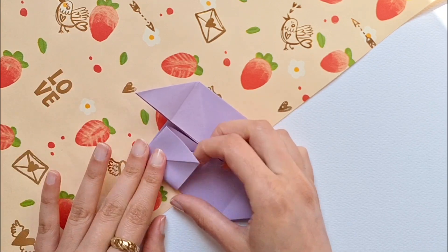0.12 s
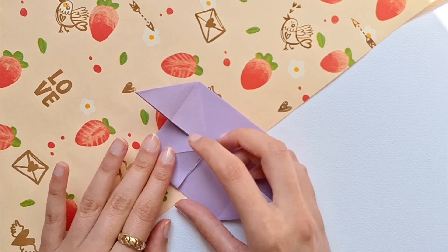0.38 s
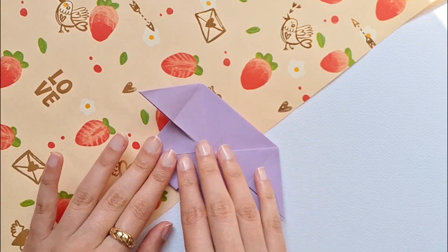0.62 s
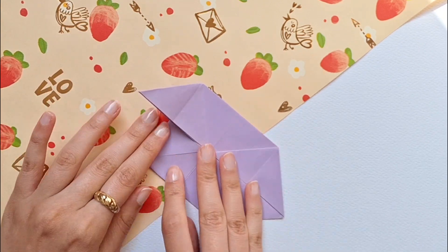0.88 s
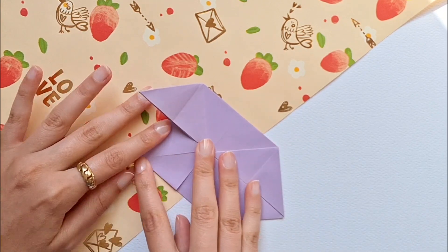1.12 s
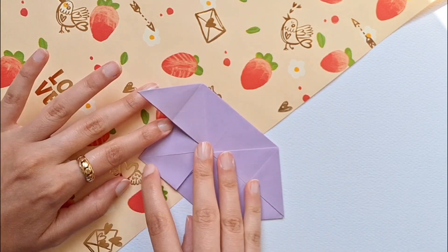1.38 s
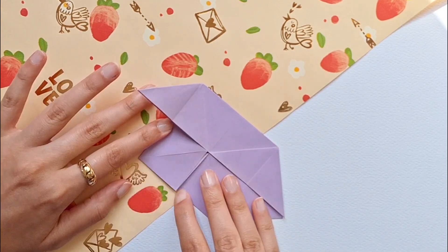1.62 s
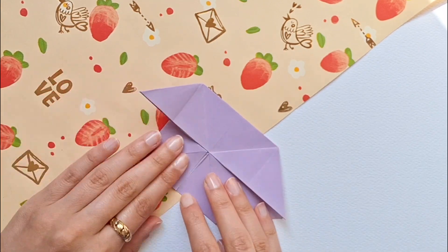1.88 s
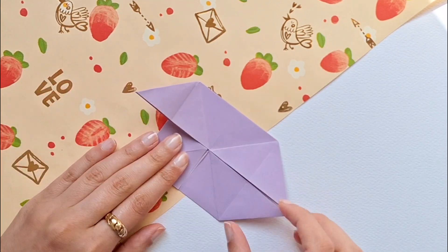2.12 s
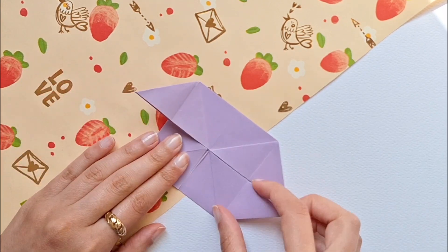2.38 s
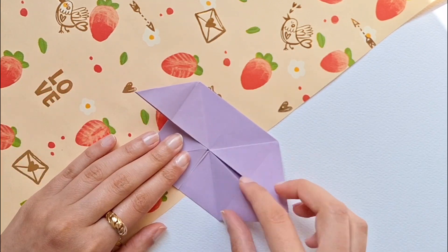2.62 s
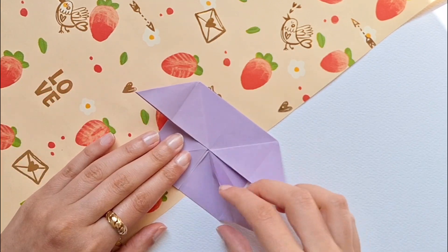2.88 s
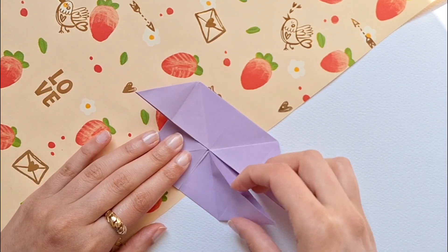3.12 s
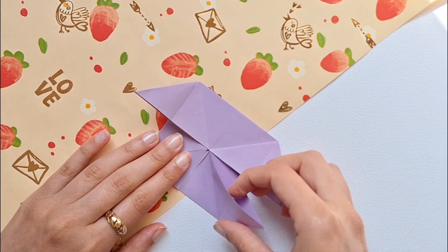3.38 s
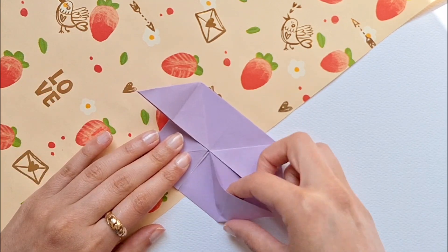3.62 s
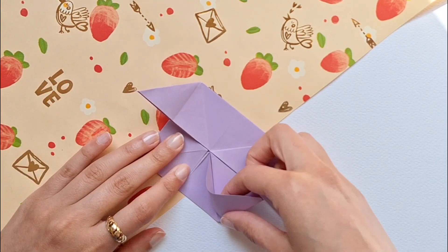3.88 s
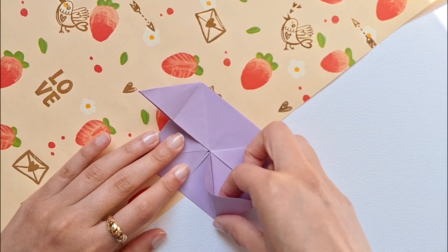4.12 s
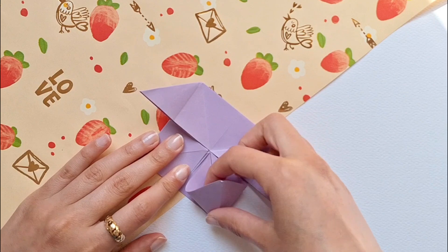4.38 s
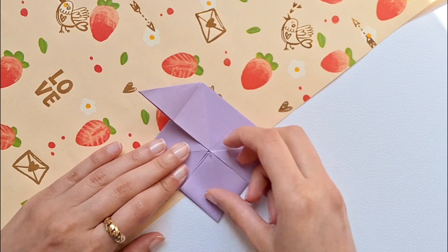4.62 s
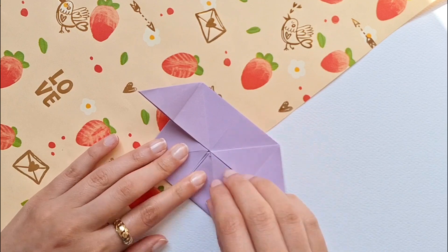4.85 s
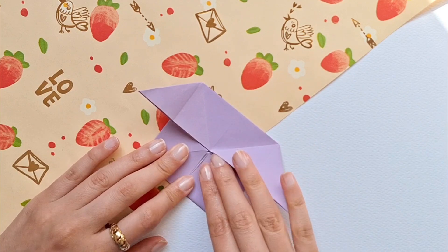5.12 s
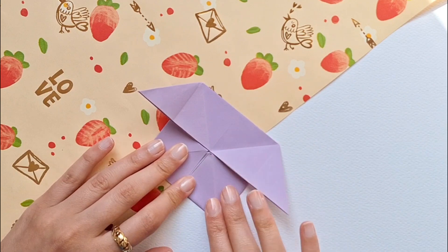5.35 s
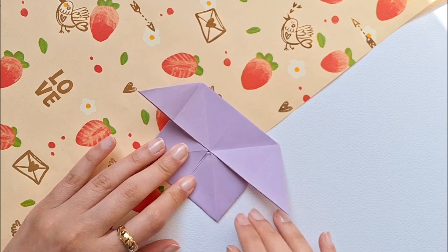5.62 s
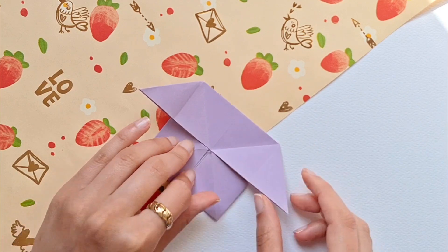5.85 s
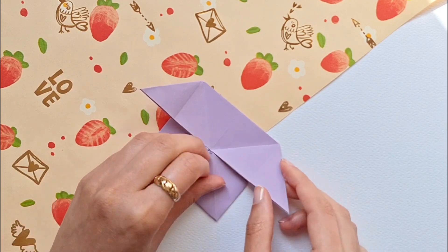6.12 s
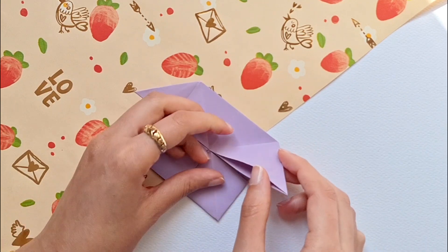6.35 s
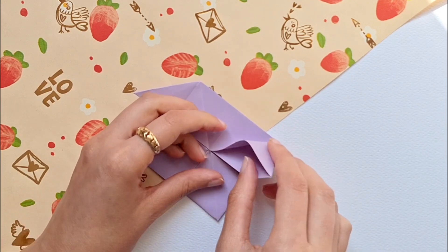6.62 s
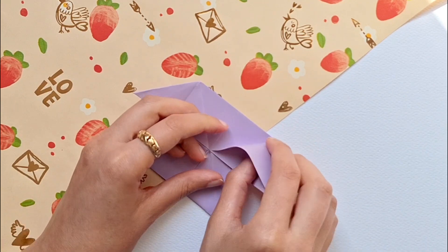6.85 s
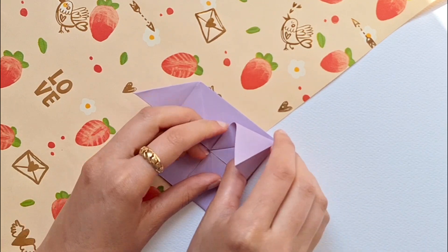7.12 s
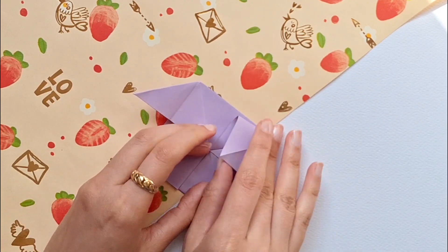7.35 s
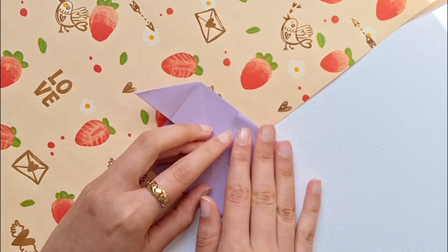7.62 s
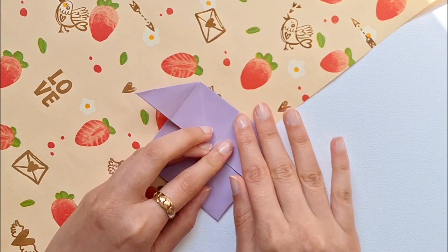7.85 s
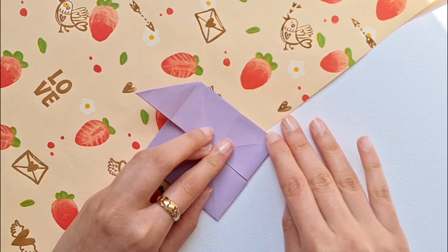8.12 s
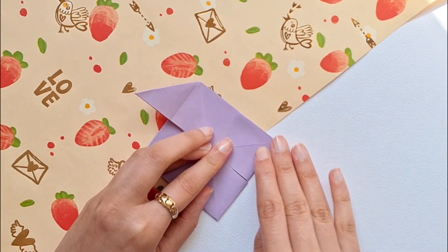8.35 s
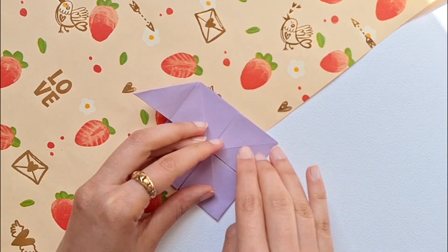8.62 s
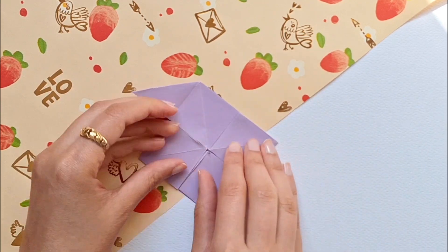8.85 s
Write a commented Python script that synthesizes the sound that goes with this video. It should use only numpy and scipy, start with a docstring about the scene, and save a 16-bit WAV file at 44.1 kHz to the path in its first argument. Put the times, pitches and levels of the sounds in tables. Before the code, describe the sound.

A close stereo microphone hears hands folding thin paper on a table in a quiet room, with faint hiss and a barely audible, very high electronic whine. At 0.1 s a crisp snap and short flex break soft sliding; smaller ticks follow. From 1.0 s fingertips tap dully, gathering into woody thumps at 1.4-1.8 s, with the sharpest crease crack near 1.67 s and more until 2.0 s. Gentle sparse strokes occupy 2-4.5 s, then clicks and flexing near 4.65 s. Outside, low rumble gains booming bass from 4.1 s as an engine hum climbs until about 5.4 s. Taps at 5.8 s lead into dense crackling at 6.2-7.2 s, then a longer smoothing rustle and tiny skin squeak near 7.7 s. Bass swells around 7.4 s and most strongly at 8.3-8.7 s; engine tones fall as final snaps and table knocks sound near 8.9 s, rumble still strong.

```python
"""A soft slide of fingers over a low rumble, then a snap: hands fold and press a paper figure on a table.
Sliding and flexing paper is shaped noise, creases snap in short bursts, and touches ring the table top.
Outside a vehicle draws near: low noise swells, engine tones glide and short bass notes boom in the room.
A faint electronic whine and a steady hiss lie behind it all; the two ports hear sounds shifted in time."""
import sys
import numpy as np
from scipy import signal
from scipy.fft import rfft, irfft, next_fast_len
from scipy.io import wavfile
from scipy.ndimage import uniform_filter1d

SR = 44100
rng = np.random.default_rng(int(sys.argv[2]) if len(sys.argv) > 2 else 0)


def unload_audio(sound):
    """Save the sound as a 16-bit wav file, at the path given as the first command line argument."""
    columns = np.transpose(np.atleast_2d(sound))
    # keep every value between -1 and 1, then stretch to whole-number steps
    steps = np.round(np.clip(columns, -1, 1) * 32767)
    wavfile.write(sys.argv[1], SR, steps.astype(np.int16))


N = 396018  # length [samples]

# Levels in the tables come before the left-right balance. "Place" is where in its length an event peaks.
# Colour of the steady hiss: (frequency [Hz], relative level [dB])
HISS_COLOUR = [(88, -36), (150, -4), (193, -0.5), (254, -2), (375, -11), (771, -21.5), (1930, -23),
               (3880, -28), (7530, -46), (8640, -40), (10500, -30), (14100, -29.5), (15800, -20)]
HISS_DB = -76.5
# The whine, one list for each pitch: (time [s], level [dB])
WHINE_LEVELS = [
    [(0.0, -103), (0.406, -103), (0.752, -92), (1.744, -89), (1.8, -95)],
    [(2.1, -100), (2.25, -80), (3.17, -84.5), (4.18, -78.5), (4.69, -81), (4.78, -78.5), (5.73, -80),
     (6.2, -81)],
    [(6.22, -83), (7.3, -78), (7.59, -86), (8.0, -73.5), (8.57, -85), (8.98, -83)],
]
# Pitches of the whine, which steps down twice: (frequency [Hz])
WHINE_PITCHES = (14482, 14461, 14413)
# Deep hump of far traffic: (time [s], level [dB])
TRAFFIC_LEVEL = [(0.0, -62), (1.67, -59), (1.7, -54.5), (1.98, -69), (2.1, -55.5), (2.73, -67), (2.77, -56),
                 (2.85, -70.5), (3.1, -55.5), (3.93, -63.5), (5.2, -57.5), (5.5, -74), (5.85, -53),
                 (6.22, -67), (6.3, -56.5), (8.0, -60.5), (8.1, -52.5), (8.23, -70), (8.5, -48.5),
                 (8.98, -59)]
# Upper rumble of the nearing vehicle: (time [s], level [dB])
VEHICLE_LEVEL = [(0.0, -63.5), (0.1, -63.5), (1.35, -73), (1.4, -57.5), (1.93, -69.5), (2.82, -73),
                 (2.9, -72), (3.1, -65), (5.63, -64), (5.9, -55.5), (5.95, -59), (6.03, -57.5), (6.1, -61),
                 (6.93, -67), (7.1, -56), (7.18, -55.5), (7.23, -58), (7.63, -56.5), (7.83, -57),
                 (8.7, -52.5), (8.73, -50.5), (8.98, -48)]
# The vehicle's lower hump: its level where the upper rumble is at -63.5 dB, and dB per dB that it follows
BODY_DB, BODY_FOLLOW = -62, 0.76
# Swells of the room boom: (start [s], length [s], frequency [Hz], top level [dB], place [0-1])
BOOM_SWELLS = [(4.1, 0.14, 76.8, -50, 0.69), (4.25, 0.54, 76.97, -49, 0.25), (4.67, .49, 77.7, -46.5, 0.59),
               (5.15, 0.16, 77, -57, 0.6), (5.39, 0.22, 80.16, -57.5, 0.73), (5.71, 0.26, 84.9, -55, 0.7),
               (5.97, 0.11, 83, -48.5, 0.46), (6.07, 0.44, 82.5, -51.5, 0.27), (6.41, 0.5, 82.1, -64, 0.5),
               (6.78, 0.33, 85.15, -52.5, 0.5), (7.12, 0.066, 87, -52, .5), (7.22, 0.76, 81.8, -42, 0.29),
               (7.79, 0.072, 78, -48.5, 0.52), (7.91, 0.19, 77.6, -46, 0.54), (8.16, 0.16, 68, -60, 0.8),
               (8.25, 0.4, 74.5, -36.5, 0.57), (8.58, 0.18, 71.97, -37.5, 0.58),
               (8.8, 0.21, 70, -42.5, 0.5)]
# Engine tones, one climbing as the vehicle speeds up, then three that end lower as it comes close:
# (time [s], frequency [Hz], level [dB])
ENGINE_ORDERS = [
    [(3.4, 131.1, -81), (3.46, 133.5, -61.5), (3.89, 129.8, -69.5), (4.17, 140.9, -53),
     (4.49, 148.1, -69.5), (4.63, 152.9, -55), (4.92, 158, -55), (5.04, 160.7, -71), (5.29, 163.4, -64.5),
     (5.45, 169, -78)],
    [(7.25, 133, -58.5), (7.4, 130.6, -56), (7.55, 125.4, -58), (7.66, 123.6, -53.5), (7.74, 121, -62)],
    [(7.76, 139.9, -60), (7.924, 147.6, -62), (8.152, 150.9, -61), (8.398, 142.4, -50.5),
     (8.474, 143.2, -57.5), (8.626, 143.4, -42.5), (8.75, 139, -60)],
    [(8.66, 129.2, -75), (8.742, 120.6, -45.5), (8.86, 116.3, -59), (8.9, 122, -45.5), (8.98, 114, -61)],
]
# Lowest ringing tones of the table: (frequency [Hz], width [Hz], relative level [dB])
DRUM_MODES = [(226, 16, -6), (268, 16, 0)]
# Higher ringing tones of the table: (frequency [Hz], width [Hz], relative level [dB])
UPPER_MODES = [(371, 23, -0.5), (458.3, 39, 0), (529, 50, -2.5), (613, 83, -2), (730, 87, -6),
               (900, 150, -7), (1074, 120, -11.5), (1330, 320, -14.5)]
# Hands pushing the table top:
# (start [s], length [s], drum level [dB], place [0-1], upper modes above the drum [dB])
TABLE_PUSHES = [(0.076, 0.16, -69.5, 0.48, -9.5), (0.358, 0.21, -69, 0.57, -9),
                (0.943, 0.33, -70, 0.68, -14), (1.295, 0.23, -57.5, 0.69, -7),
                (1.437, 0.11, -56, 0.61, 3.5), (1.512, 0.15, -49.5, 0.56, -7.5),
                (1.647, 0.12, -53.5, 0.11, -2.5), (1.762, 0.2, -60.5, 0.14, -4),
                (2.047, 0.65, -74, 0.23, -30), (2.97, 0.23, -71.5, 0.3, -5.5), (3.301, 0.34, -66, 0.54, -6),
                (3.628, 0.87, -74.5, 0.1, -5), (4.15, 0.74, -67, 0.45, -12.5),
                (4.597, 0.13, -68.5, 0.55, 2.5), (4.725, 0.097, -61, 0.59, -14),
                (4.82, 0.54, -67.5, 0.32, -9.5), (5.45, 0.35, -70.5, 0.3, -11),
                (5.787, 0.077, -71.5, .5, 5.5), (5.853, 0.29, -64, 0.24, -2), (6.06, .13, -61, 0.26, -22),
                (6.153, 0.21, -62.5, 0.08, -8), (6.376, 0.33, -69, 0.07, -4.5), (6.63, 0.17, -79, .5, 5.5),
                (6.777, 0.33, -73, 0.47, 2), (7.065, 0.3, -70, .5, -2.5), (7.257, 0.15, -72.5, 0.5, 4),
                (7.364, 1, -74.5, 0.1, -0.5), (8.04, 0.22, -66.5, 0.46, 3.5), (8.294, 0.54, -70, 0.32, 1.5),
                (8.687, 0.22, -63.5, 0.89, 0.5), (8.88, 0.21, -55.5, 0.2, -20)]
REST_DRUM_DB, REST_UPPER_DB = -78, -89  # the table under resting hands
# Fingertips landing on the table:
# (time [s], drum peak [dB], upper modes above it, or hardness [dB], soft thud above it [dB])
FINGER_TAPS = [(1.021, -61, -9, -17), (1.103, -64, -12, -16), (1.181, -57.5, -15, -15),
               (1.343, -64, -15, -16), (1.45, -51, -22, -30), (1.472, -43, -13, -28), (1.585, -52, -2, -33),
               (1.602, -48, -16, -13), (1.667, -47.5, -11, -27), (1.783, -51.5, -4.5, -28),
               (3.053, -65, -18, -7), (4.636, -67, -17, -6), (5.794, -61, -7, -6), (5.816, -48.5, -7, 1),
               (5.886, -51, 2.5, -17), (6.646, -63, -10, -8), (7.168, -52.5, -5, 6), (7.309, -51, -5, 1),
               (8.103, -55.5, -10, -9), (8.876, -45, -9, -6), (8.898, -52, -20, -14)]
# Skin skidding on the crease: (start [s], length [s], frequency [Hz], top level [dB], place [0-1])
SKIN_SQUEAKS = [(7.69, 0.039, 7540, -49.5, 0.6), (7.722, 0.057, 7560, -55.5, 0.3),
                (7.77, 0.085, 7560, -68, 0.3)]
# Creases snapping: (time [s], level before a later lift [dB], centre [Hz], share of wide crack [0-1])
CREASE_SNAPS = [(0.1319, -44.5, 1840, 0), (0.4415, -59, 7360, 0), (0.6275, -63, 6460, 0.5),
                (1.5704, -43.5, 3120, 0.94), (1.6658, -33, 7500, 0.6), (1.803, -49, 7300, 0.6),
                (1.8738, -38, 7040, 0.43), (2.018, -53, 7900, 0.2), (2.7099, -55, 8100, 0.66),
                (2.9257, -58, 6460, 0.2), (3.1373, -62, 6400, 0.2), (3.341, -54, 1810, 0.56),
                (3.8412, -53, 7400, 0), (3.891, -56, 1700, 0.6), (4.367, -61, 7250, 0.1),
                (4.6354, -47, 2920, 0), (4.6575, -51, 1530, 0.12), (4.664, -48, 5200, 0),
                (4.7627, -58, 2962, 0.44), (4.9087, -56, 2160, 0.73), (5.884, -59, 1800, 0.7),
                (6.222, -50.5, 7700, 0.2), (6.232, -55, 6500, .3), (6.252, -53.5, 7300, 0.4),
                (6.3704, -57.5, 7300, 0.5), (6.4, -48.5, 3160, 0.66), (6.5128, -58, 1890, 0.56),
                (6.5941, -55, 2240, 0.4), (6.647, -57, 1400, 0.2), (6.662, -63, 2900, 0.35),
                (6.6917, -48, 2060, 0.74), (6.9155, -49, 4000, 0.5), (6.989, -51, 2860, 0.42),
                (7.17, -50, 4830, 0), (8.6322, -48.5, 5660, 0.54), (8.8684, -41, 2770, 0.87),
                (8.957, -45, 7340, 0.4)]
# Colour of sliding paper: (frequency [Hz], relative level [dB])
SLIDE_COLOUR = [(2500, -49), (3600, -16.5), (4400, -6), (4720, -2), (5300, -1.5), (6500, -1.5), (7500, 2),
                (8300, -6.5), (9500, -27.5), (12000, -47)]
# Colour of the flexing sheet: (frequency [Hz], relative level [dB])
FLEX_COLOUR = [(900, -14), (1300, -5), (1500, -5), (1800, -1), (2200, -2), (2700, 1), (3200, -1.5),
               (4000, -4), (5000, -12), (7000, -24)]
# Colour of the dry edge of a slide: (frequency [Hz], relative level [dB])
EDGE_COLOUR = [(6500, -22), (9000, -2.5), (10500, 1), (12000, 4), (14000, 5), (16000, -0.5)]
# Fingers sliding on paper:
# (start [s], length [s], top hiss level [dB], place [0-1], dry edge above the hiss [dB])
FINGER_STROKES = [(0.0, 0.13, -69.5, 1, -2.5), (0.128, 0.07, -57.5, 0.56, 4.5),
                  (0.203, 0.13, -76, 0.26, -4), (0.344, 0.11, -73.5, 0.7, -8),
                  (0.443, 0.093, -69.5, 0.57, -4), (0.535, 0.074, -77.5, 0, -3),
                  (0.611, 0.039, -72.5, 0.6, 1), (0.643, .191, -79.5, .95, 1),
                  (0.828, 0.089, -68.5, .35, 5), (0.907, 0.067, -70, 0.54, 1),
                  (.965, 0.26, -77, 0.32, -0.5), (1.414, 0.17, -67, 0.61, -1.5), (1.564, 0.15, -65, 0, -2),
                  (1.665, 0.016, -41, 0, -12), (1.68, 0.1, -63, 0, -7), (1.791, 0.14, -64.5, 0.32, -1),
                  (1.871, 0.091, -52.5, 0, -2.5), (1.968, 0.11, -60.5, 0.63, 0.5),
                  (2.176, 0.038, -74, .38, -8), (2.302, .115, -81.5, 0, -3), (2.424, 0.089, -71, 0.42, -6),
                  (2.704, 0.035, -78, 0.2, -3), (2.919, 0.16, -69.5, 0.16, 0), (3.128, 0.074, -72, 0.2, 2),
                  (3.346, 0.13, -60.5, 0.19, -4), (3.418, .112, -61.5, 0.65, -1),
                  (3.516, 0.11, -62, 0.16, -4.5), (3.639, 0.089, -63.5, 0.08, -15),
                  (3.729, 0.18, -69.5, .1, -9), (3.845, 0.022, -68, 0.1, -5),
                  (3.875, 0.058, -68.5, 0.1, -3), (4.006, 0.17, -71.5, 0.53, -6),
                  (4.303, 0.063, -73, 0.63, -9), (4.364, 0.12, -61.5, 0.25, -5),
                  (4.501, .133, -65, 0.7, -3), (4.634, 0.031, -62, 0.1, -12), (4.65, .082, -63, 0.2, -5),
                  (4.753, 0.035, -68, .4, -6), (4.782, 0.13, -74, 0.07, -1.5), (4.898, 0.35, -69, 0.37, -2),
                  (5.129, 0.35, -69.5, 0.43, -1.5), (5.426, 0.099, -82.5, 0.1, 3),
                  (5.581, 0.074, -73, 0.67, -1), (5.818, 0.11, -70, 0.78, -6), (5.927, 0.23, -68, 0.52, -4),
                  (6.169, .087, -67.5, 0.14, -4), (6.257, 0.07, -78, 0, 0), (6.346, 0.06, -80, .45, -5),
                  (6.397, 0.082, -63, 0, -8), (6.504, 0.084, -74, 0.2, -11), (6.589, 0.036, -64, 0.07, -17),
                  (6.649, 0.088, -68, 0.64, -1), (6.752, 0.12, -69, .46, -7),
                  (6.851, 0.22, -63.5, 0.43, -5), (7.089, 0.094, -67.5, 0.39, -11),
                  (7.162, 0.2, -66, 0.13, -3), (7.228, 0.21, -59, 0.94, -2.5),
                  (7.438, 0.41, -62.5, 0, -1.5), (7.67, 0.089, -58, 0.32, -7.5),
                  (7.786, 0.15, -66, 0.43, -2.5), (7.937, .1, -79, 0.8, -6), (8.041, 0.25, -70, 0.27, -6),
                  (8.341, 0.11, -64, 0.44, -0.5), (8.41, 0.08, -62.5, 1, 0.5), (8.5, 0.19, -71, 0, -2),
                  (8.658, 0.15, -61.5, 0.31, -8), (8.777, 0.081, -68.5, 0.4, -2),
                  (8.827, 0.17, -59, 0.31, 0), (8.958, 0.033, -63, 0.2, -8)]
# The sheet bending open: (start [s], length [s], top level [dB], place [0-1], pitch of the pocket [Hz])
SHEET_FOLDS = [(0.132, 0.016, -48, 0, 1730), (0.142, 0.068, -53, 0.31, 1770), (0.2, 0.13, -81, 0.1, 1820),
               (1.433, 0.17, -69, .5, 900), (1.566, 0.11, -63.5, 0.15, 900), (1.663, 0.071, -54, 0, 1790),
               (1.767, 0.052, -69.5, 0.46, 1060), (2.18, 0.038, -77, 0.6, 1460),
               (3.333, 0.094, -63.5, 0.64, 1850), (3.435, 0.15, -80, 0, 3600),
               (3.658, 0.05, -76, 0.4, 1950), (3.882, 0.064, -67.5, 0.28, 1620),
               (4.133, .072, -81, 0, 2000), (4.402, .102, -70, 0.2, 4200), (4.485, 0.19, -65, 0.72, 3180),
               (4.634, 0.031, -55, 0, 2960), (4.655, 0.083, -61.5, 0.05, 3320), (4.77, 0.088, -79, 0, 900),
               (5.43, 0.19, -77, 0.1, 1920), (5.657, 0.22, -87, 0, 900), (5.819, 0.098, -72, 1, 900),
               (5.911, 0.18, -70, 0.74, 1890), (6.174, 0.097, -66.5, 0.06, 3170),
               (6.278, 0.21, -82.5, .1, 1976), (6.405, 0.094, -64, 0.06, 3040),
               (6.5, 0.16, -72.5, 0.65, 1900), (6.645, 0.088, -58.5, 0.23, 1030),
               (6.69, 0.042, -53.5, 0.3, 956), (6.733, 0.036, -68.5, 0, 1490),
               (6.755, 0.098, -63, 0.63, 2360), (6.84, 0.08, -70, 0.95, 3490),
               (6.913, 0.057, -62.5, 0.34, 1300), (6.97, 0.14, -67.5, 0.02, 2900),
               (7.17, 0.15, -62.5, 0.1, 3940), (7.225, 0.24, -61, 0.69, 4320), (7.442, 0.4, -66, 0, 2420),
               (7.927, 0.15, -76.5, 0.65, 2260), (8.082, 0.24, -71.5, 0.38, 900),
               (8.333, 0.35, -64.5, 0.38, 2470), (8.75, 0.081, -67, 0.3, 980)]
STILL_DB, REST_FLEX_DB, REST_EDGE_DB = -89.5, -91, -89.5  # paper under resting hands
REST_POCKET_HZ = 2096
FADE_SHARE = 0.5  # a movement fades by at most this share of its height above stillness
FLEX_PER_STROKE_DB = -8  # flexing caused by a stroke, relative to its hiss
LEAD_S = 0.000095  # the left port hears the hands first
STREET_LEAD_S = -0.0012  # the bass from outside reaches the right port first


def gain_of(db):
    """Turns decibels into a gain."""
    return 10 ** (np.asarray(db) / 20)


def evened(x):
    """Scales to an average (rms) strength of 1."""
    return x / np.sqrt(np.mean(x ** 2) + 1e-20)


def columns(rows):
    """Gives each column of a curve at every sample, and a soft switch for where the curve runs."""
    s, *values = np.transpose(rows)
    t = np.arange(N) / SR
    running = 1.0 * (t > s[0]) * (t <= s[-1] + 0.001)
    return [np.interp(t, s, v) for v in values], uniform_filter1d(running, size=200)


def add(mix, s, sound):
    """Mixes a sound in from time s."""
    part = mix[..., round(max(s, 0) * SR):][..., :sound.shape[-1]]
    part += sound[..., :part.shape[-1]]


def coloured(x, points):
    """Filters by a colour curve; outside its points almost nothing passes."""
    size = next_fast_len(N)
    hz, db = np.transpose(points)
    log_hz = np.log(np.fft.rfftfreq(size, 1 / SR) + 1)
    shape = np.interp(log_hz, np.log(hz), db, left=-90, right=-90)
    return irfft(rfft(x, size) * gain_of(shape), size)[..., :N]


def mode(x, hz, width):
    """Rings at one fixed pitch with gain 1 there; a narrower width rings longer."""
    return signal.lfilter(*signal.iirpeak(hz, hz / abs(width), fs=SR), x)


def rung(x, modes):
    """Sums the modes that x sets ringing, with alternating signs."""
    total = 0
    for k, (hz, width, db) in enumerate(modes):
        total = total + (-1) ** k * gain_of(db) / np.sqrt(abs(width)) * mode(x, hz, width)
    return total


def resonate(x, hz, width):
    """Rings at a moving pitch: shifts the curve hz down to zero, smooths, and shifts back."""
    turn = np.exp(2j * np.pi * np.cumsum(hz * np.ones(N)) / SR)
    r = np.exp(-np.pi * abs(width) / SR)
    return 2 * (turn * signal.lfilter([1 - r], [1, -r], x / turn)).real


def ports(x, same, pan_db, lead_s=LEAD_S):
    """Makes a port pair of two unrelated sounds: a shared part, a delay on the right and a balance."""
    same = np.clip(same, 0, 1)
    right = same * x[0] + np.sqrt(1 - same ** 2) * x[1]
    size = next_fast_len(N + 512)
    right = np.pad(right, (0, size - N), "reflect")
    delay = np.exp(-2j * np.pi * np.fft.rfftfreq(size, 1 / SR) * lead_s)
    late = irfft(rfft(right, size) * delay, size)[:N]
    return np.array([x[0] * gain_of(pan_db / 2), late / gain_of(pan_db / 2)])


def swell(length, place, point):
    """Makes a smooth rise and fall, highest at place; a larger point makes it narrower."""
    done = np.arange(0, length, 1 / SR) / length
    bend = np.log(0.5) / np.log(np.clip(place, 0.05, 0.95))
    return abs(np.sin(np.pi * done ** bend)) ** point


def swelling_tone(rows, point, pan_db, lead_s):
    """Plays one short steady note for every row, each swelling and fading."""
    out = np.zeros((2, N))
    balance_db = np.array([[pan_db], [-pan_db]]) / 2
    for (s, length, hz, db, place), turn in zip(rows, rng.random(len(rows))):
        shape = swell(length, place, point)
        turns = hz * (np.arange(len(shape)) / SR - np.array([[0], [lead_s]])) + turn
        add(out, s, gain_of(db + balance_db) * shape * np.sqrt(2) * np.sin(2 * np.pi * turns))
    return out


def tone(rows, waver_hz, pan_db, lead_s):
    """Plays a line that follows its curve and wavers a little in strength."""
    (hz, db), running = columns(rows)
    waver = evened(uniform_filter1d(rng.standard_normal(N), int(SR / waver_hz)))
    turns = np.cumsum(hz) / SR + rng.random() - np.outer([0, lead_s], hz)
    line = np.sqrt(2) * np.sin(2 * np.pi * turns) * gain_of([[pan_db / 2], [-pan_db / 2]])
    return gain_of(db + 1.2 * waver) * running * line


def grains(per_s, spread_db, smooth):
    """Catches fibres: sparse ticks of uneven size over smooth noise, in clumps."""
    clumps = gain_of(1.4 * evened(uniform_filter1d(rng.standard_normal(N), size=500)))
    sign = rng.choice([-1., 1.], (2, N))
    size = gain_of(spread_db * np.minimum(rng.exponential(1, (2, N)), 4)) * sign
    ticks = size * (rng.random((2, N)) < per_s / SR)
    return clumps * (evened(ticks) + smooth * rng.standard_normal((2, N)))


def hiss():
    """Steady noise with a fixed colour, partly shared by the ports."""
    noise = coloured(rng.standard_normal((2, N)), HISS_COLOUR)
    return gain_of(HISS_DB) * ports(evened(noise), 0.63, 0.84)


def whine():
    """A thin electronic tone, mostly at the right port, in three spells of falling pitch."""
    total = 0
    for hz, rows in zip(WHINE_PITCHES, WHINE_LEVELS):
        total = total + tone([(s, hz, db) for s, db in rows], 22.0, -12.0, -0.000021)
    return total


def hump(db, hz, width):
    """Noise passed twice through one broad resonance makes a soft hump of rumble."""
    noise = rng.standard_normal((2, N))
    return gain_of(db) * evened(mode(mode(noise, hz, width), hz, width))


def traffic():
    """Far traffic and the vehicle come through the walls as low noise in three overlapping humps."""
    (deep_db,), _ = columns(TRAFFIC_LEVEL)
    (upper_db,), _ = columns(VEHICLE_LEVEL)
    middle_db = BODY_DB + BODY_FOLLOW * (upper_db + 63.5)
    low = hump(deep_db, 52.7, 38) + hump(middle_db, 81.3, 32)
    upper = hump(upper_db, 127.5, 83.7)
    return ports(low, 1.0, 3.7, STREET_LEAD_S) + ports(upper, 1.0, 2.1, STREET_LEAD_S / 4)


def boom():
    """The vehicle makes the room boom: short bass notes that swell and fade."""
    return swelling_tone(BOOM_SWELLS, 1, 3.0, STREET_LEAD_S)


def engine():
    """Engine orders are low tones that glide in pitch."""
    return sum(tone(rows, 24.0, 1.8, -0.00014) for rows in ENGINE_ORDERS)


def table_pushes():
    """Scraping pushes keep the modes of the table top ringing."""
    power = gain_of([[REST_DRUM_DB], [REST_UPPER_DB]]) ** 2 * np.ones(N)
    for s, length, db, place, upper_db in TABLE_PUSHES:
        add(power, s, (gain_of([[db], [db + upper_db]]) * swell(length, place, 1.1)) ** 2)
    scrape = grains(400, 2.75, 0.74)
    # colour curves: (frequency [Hz], relative level [dB])
    drum_colour = [(130, -37), (200, 5), (300, -6), (420, -1), (900, -28)]
    upper_colour = [(250, -21.5), (420, -4), (1500, -1.5), (2400, -16)]
    drum = np.sqrt(power[0]) * evened(coloured(rung(scrape, DRUM_MODES), drum_colour))
    upper = np.sqrt(power[1]) * evened(coloured(rung(scrape, UPPER_MODES), upper_colour))
    return ports(drum, 1.0, 2.7, 0.00001) + ports(upper, 0.49, 3.1, 0.00002)


def table_taps():
    """Soft fingertip blows, under a millisecond long, ring the table and thud in the flesh."""
    blows, pad = np.zeros((3, N)), np.hanning(40)
    for s, db, hard_db, thud_db in FINGER_TAPS:
        add(blows, s, gain_of([[db], [db + hard_db], [db + thud_db]]) * pad)
    one_blow = np.pad(pad, (0, 2000))
    # the fingertip hardly rings: (frequency [Hz], width [Hz], relative level [dB])
    flesh = [(367, 180, 0), (164, 82, 0)]
    taps = 0
    for blow, modes in zip(blows, (DRUM_MODES, UPPER_MODES, flesh)):
        taps = taps + rung(blow, modes) / abs(rung(one_blow, modes)).max()
    return taps * gain_of([[0.8], [-0.8]])


def squeak():
    """Skin skidding on the crease gives short high notes."""
    return swelling_tone(SKIN_SQUEAKS, 2.1, -1.7, LEAD_S)


def snaps():
    """Each snap is a burst of about a millisecond, its echo off the table and a short tail."""
    out, t = np.zeros((2, N + 4000)), np.arange(2000) / SR
    crisp = signal.butter(2, [1100, 16000], "band", fs=SR)
    tail = gain_of(-31 - 60 * t / 0.22) * (1 - np.exp(-t / 0.0037))

    def burst(peak_s):
        return np.exp(-abs(t - peak_s) / np.where(t < peak_s, 0.0002, 0.0005))

    envelope = burst(0.00122) + 0.17 * burst(0.00417) + tail
    for (s, db, hz, wide), noise in zip(CREASE_SNAPS, rng.standard_normal((len(CREASE_SNAPS), 3, 2000))):
        # each port has its own noise plus a little that both share
        blow = (noise[:2] * 1.76 + noise[2] * 0.23) * envelope
        crack = signal.lfilter(*crisp, blow)
        ring = mode(blow, hz, hz / 10.0)
        wide = np.clip(wide, 0, 1)
        snap = wide * crack / abs(crack).max() + (1 - wide) * ring / abs(ring).max()
        for side, sign in enumerate((1, -1)):
            at = round((s + side * LEAD_S) * SR)
            out[side, at:at + 2000] += gain_of(db + 8.0 + sign * 2.06) * snap[side]
    return out[:, :N]


def movement(length, top_db, place):
    """A hand starts and stops abruptly; its level in dB climbs to the strongest place and falls away."""
    done, place = np.arange(0, length, 1 / SR) / length, np.clip(place, 0, 1)
    return top_db - FADE_SHARE * (top_db - STILL_DB) * abs(done - place) / max(place, 1 - place)


def patchy(x, patch_db):
    """The sheet rings unevenly: its colour drifts in small patches of time and pitch."""
    z = signal.stft(x, nperseg=256)[2]
    patches = uniform_filter1d(rng.standard_normal(z.shape[1:]), size=4, axis=0)
    patches = uniform_filter1d(patches, size=8, axis=1)
    return signal.istft(z * gain_of(patch_db * evened(patches)), nperseg=256)[1][:, :N]


def air_pocket(fibres, hz):
    """The open fold is a small air pocket that rings, with a weaker overtone."""
    def ringing(pitch):
        return resonate(resonate(fibres[0], pitch, 650.0), pitch, 650.0)

    return ringing(hz) + 0.44 * ringing(2 * hz)


def rustle():
    """Strokes drive sliding hiss, the dry edge and a little flexing; folds flex the sheet and open a pocket."""
    power = gain_of([[STILL_DB], [REST_FLEX_DB], [REST_EDGE_DB]]) ** 2 * np.ones(N)  # slide, flex, edge
    pocket_hz = np.full(N, 1.0 * REST_POCKET_HZ)
    late = 0.00078  # [s]; the hiss follows the first catch of the paper
    for s, length, db, place, edge_db in FINGER_STROKES:
        parts_db = movement(length, db, place) + np.array([[0], [FLEX_PER_STROKE_DB], [edge_db]])
        add(power, s + late, gain_of(parts_db) ** 2)
    for s, length, db, place, hz in SHEET_FOLDS:
        add(power[1], s + late, gain_of(movement(length, db, place)) ** 2)
        pocket_hz[round(s * SR):round((s + length) * SR)] = hz
    level = uniform_filter1d(np.sqrt(power), size=130, axis=1)  # starts and stops take 3 ms
    fibres = patchy(grains(2500, 0.65, 2.86), 0.94)
    slide = level[0] * evened(coloured(fibres, SLIDE_COLOUR))
    sheet = evened(coloured(fibres, FLEX_COLOUR)) + 0.44 * evened(air_pocket(fibres, pocket_hz))
    flex = level[1] * evened(sheet)
    edge = level[2] * evened(coloured(fibres, EDGE_COLOUR))
    return ports(slide, 0.057, 1.8) + ports(flex, 0.14, 3.5, 0.00007) + ports(edge, 0.15, -2.5)


def scene():
    """Room, street, table and hands together."""
    background = hiss() + whine()
    street = traffic() + boom() + engine()
    table = table_pushes() + table_taps()
    paper = squeak() + snaps() + rustle()
    return background + street + table + paper


def roll_off(x):
    """The treble ends steeply here."""
    return signal.sosfilt(signal.butter(12, 16660, fs=SR, output="sos"), x)


def record(dry):
    """Takes the finished mix to the sound that is written out."""
    return roll_off(dry)


dry = scene()
out = record(dry)
unload_audio(out)
```